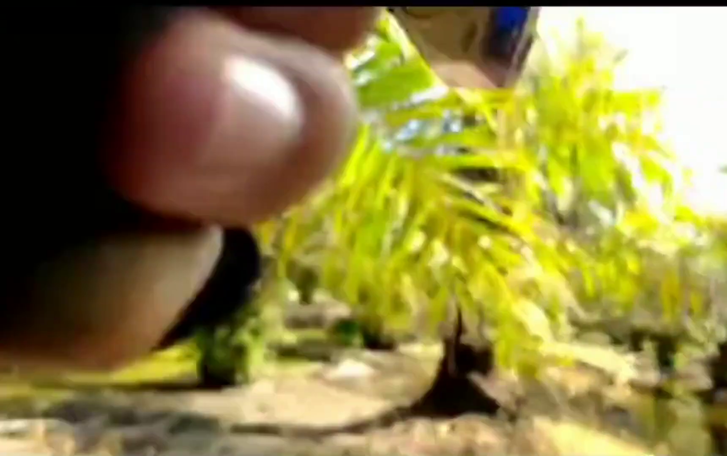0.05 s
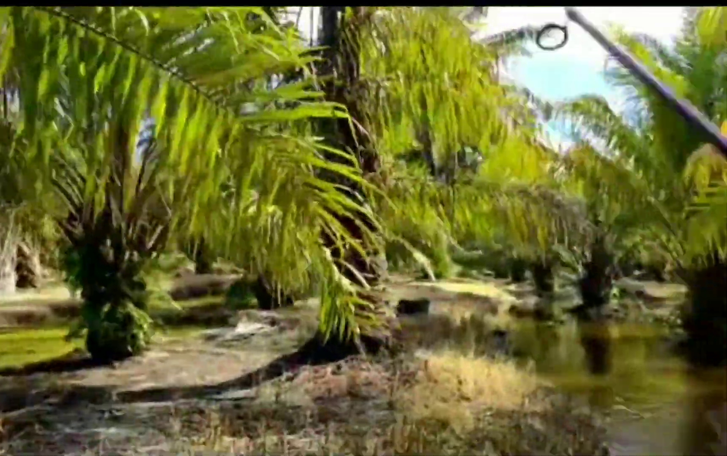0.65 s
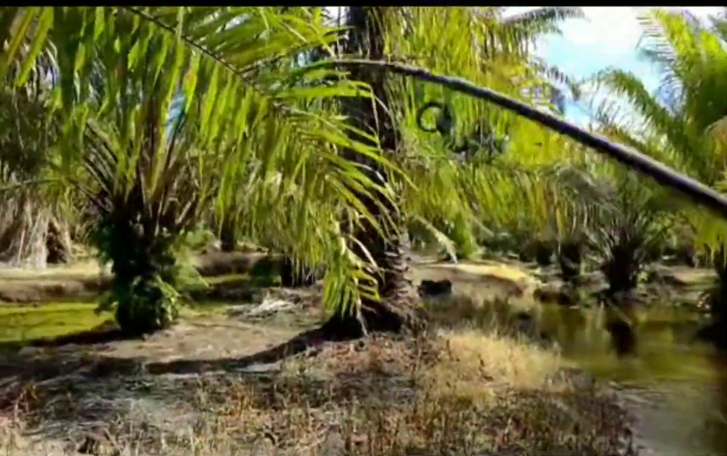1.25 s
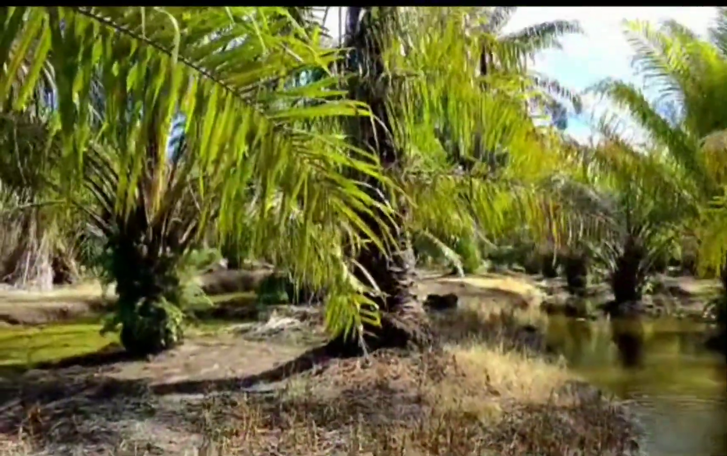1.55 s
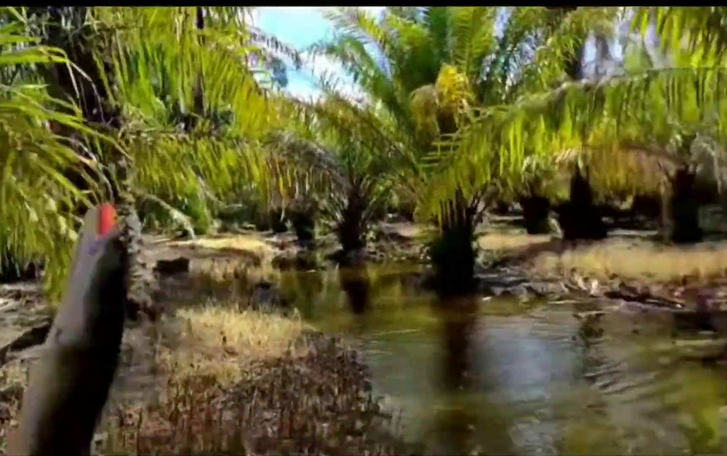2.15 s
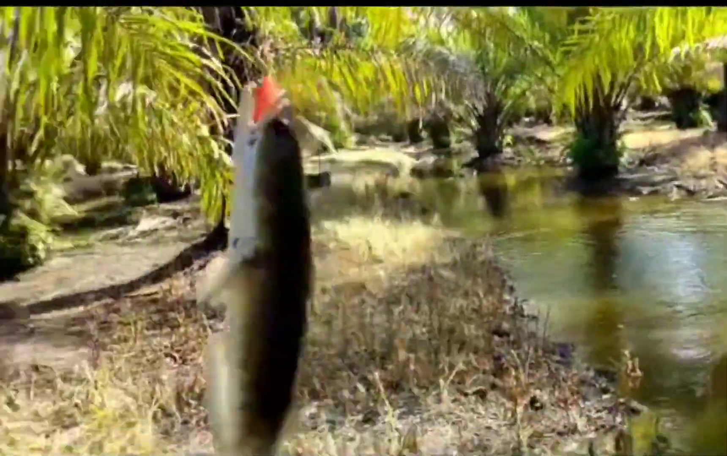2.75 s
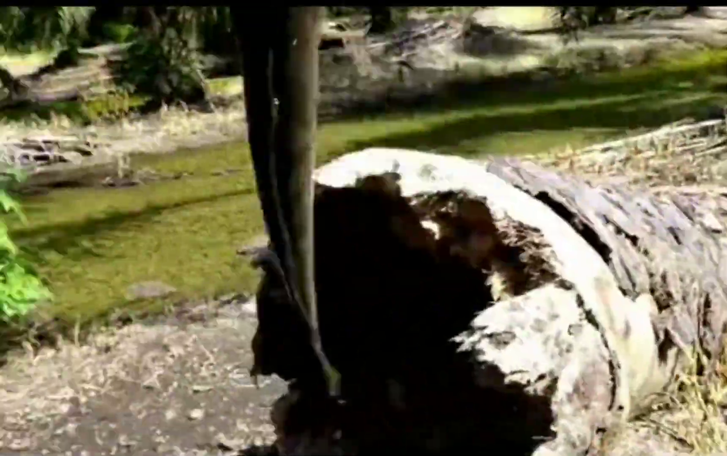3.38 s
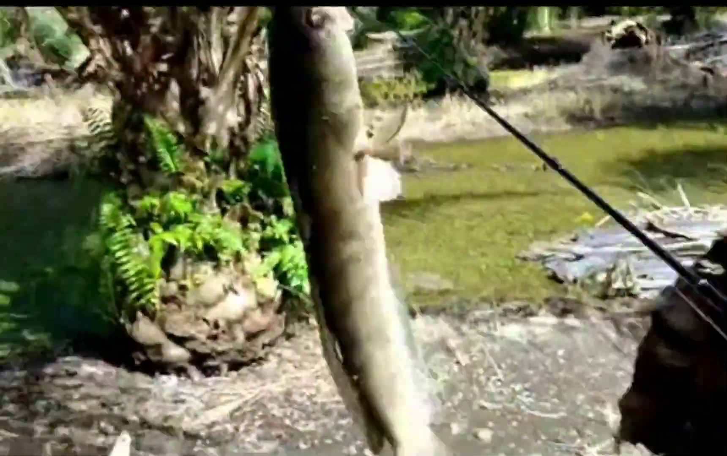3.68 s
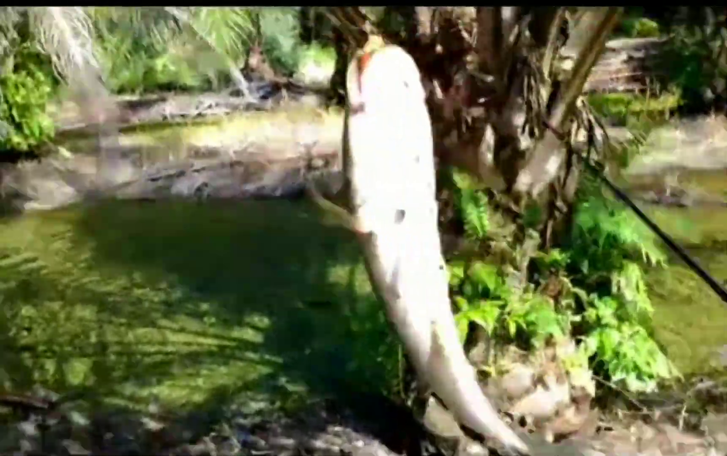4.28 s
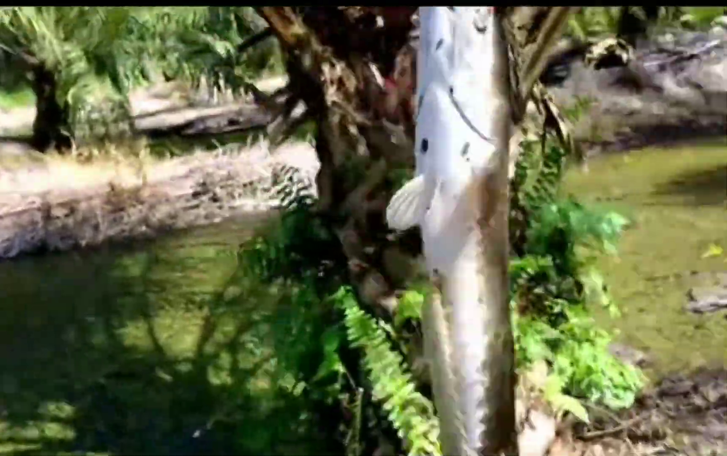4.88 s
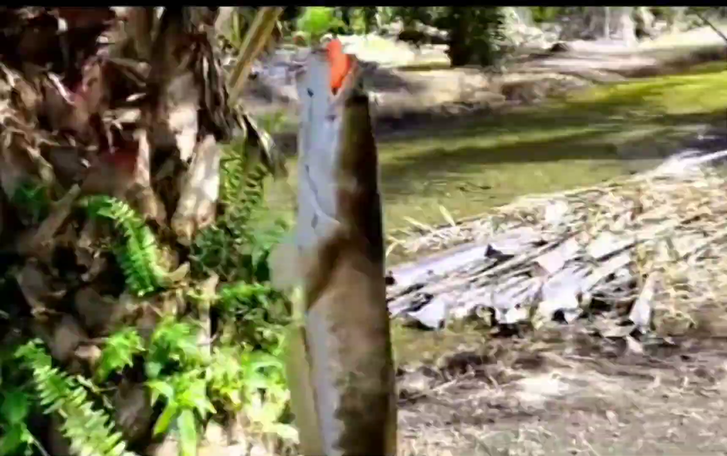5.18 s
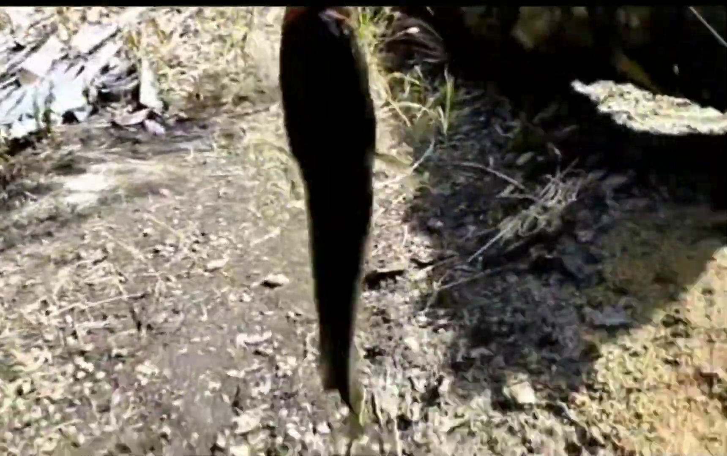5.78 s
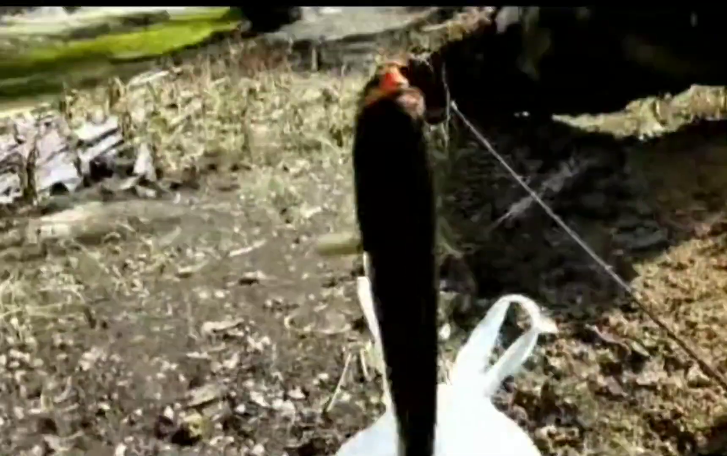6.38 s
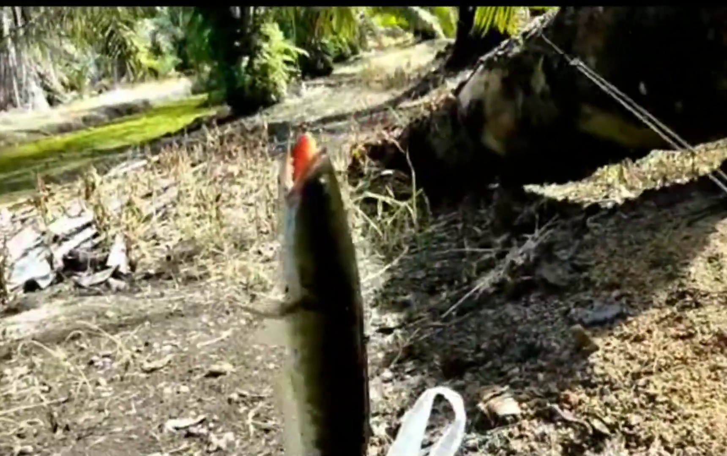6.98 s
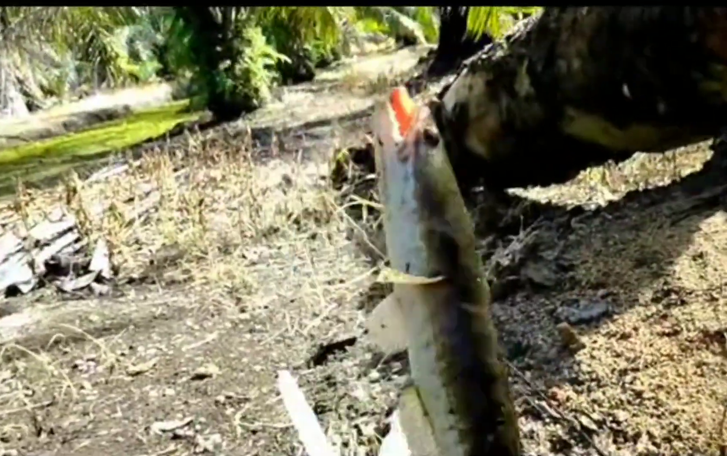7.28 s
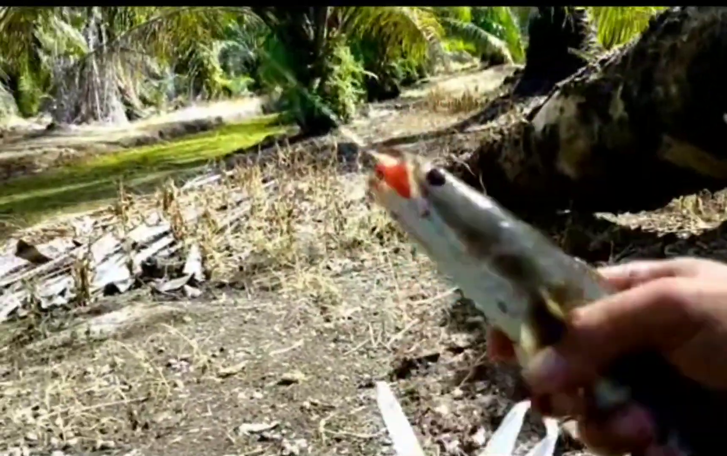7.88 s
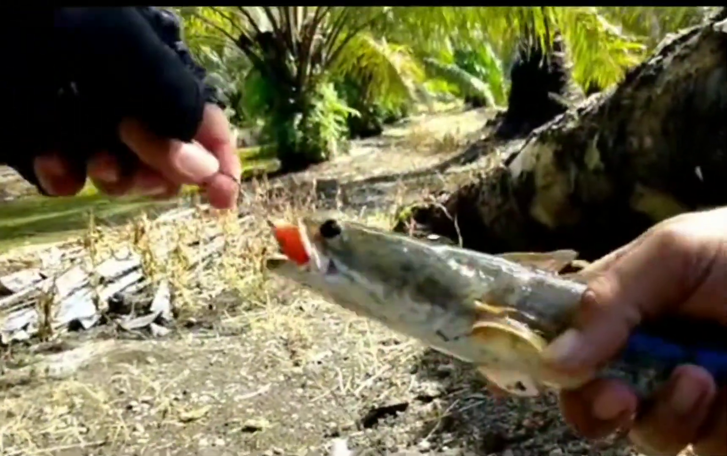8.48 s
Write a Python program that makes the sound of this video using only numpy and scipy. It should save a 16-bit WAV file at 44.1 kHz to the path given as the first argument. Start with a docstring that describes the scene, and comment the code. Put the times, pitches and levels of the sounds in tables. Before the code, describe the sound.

In a palm grove beside a pond, a bird on the left repeats short falling whistles while others answer from far off. Midway, a louder animal, perhaps a gibbon, gives rising whoops and a wavering hoot that echo through the trees, then whoops twice more near the end. Crickets chirp over a high insect drone, faint songbirds and a distant engine hum. Fishing tackle ticks lightly close to the microphone.

```python
"""A palm plantation by a pond. A bird repeats short falling whistles and others answer from far off;
a larger caller, perhaps a gibbon, whoops through the trees. Trunks and fronds scatter the calls into
long tails. Crickets rub their wings in turn over faint songbirds and a high insect drone, two distant
pump engines hum and beat, and fishing tackle ticks close by."""
import sys
import numpy as np
from scipy import signal
from scipy.fft import rfft, irfft
from scipy.io import wavfile

SR = 44100
rng = np.random.default_rng(int(sys.argv[2]) if len(sys.argv) > 2 else 0)


def output_pcm(signal):
    """Save a mono or channel-first signal as 16-bit PCM at the path in sys.argv[1].

    Samples are clipped to [-1, 1] before scaling.
    """
    pcm = np.clip(np.atleast_2d(signal).T, -1, 1) * 32767
    wavfile.write(sys.argv[1], SR, np.round(pcm).astype(np.int16))


N = 381024
T = np.arange(N) / SR
FREQ = np.fft.rfftfreq(N, 1 / SR)


def whistle(length_s, final_hz, fall_db, held_db):
    """A quick fall of almost an octave onto a short, slightly sinking tone."""
    fall_s = .031
    t = T[:int(length_s * SR)]
    ratio = np.interp(t, [0, fall_s, 2 * fall_s], [1.85, 1.025, 1])
    dip_db = -5 * np.exp(-((ratio - 1.256) / .2) ** 2)  # thins part-way down
    db = np.interp(t, [fall_s, 1.1 * fall_s], [fall_db, held_db]) + dip_db + 3 * walk(140, len(t))
    hz = final_hz * ratio * (1 + .008 * walk(200, len(t)))
    return fade(t, attack_s=.0092, release_s=.0091) * undb(db) * np.sin(phase_of(hz))


def whistlers():
    """One near bird with a quick trunk echo; others answer, blurred by distance."""
    # near notes: (time [s], length [s], final pitch [Hz], fall level [dB], held level [dB])
    whistles = [(0.261, 0.077, 1148, -48, -49.5), (0.702, 0.093, 1166, -44, -47),
                (1.094, 0.084, 1195, -44.5, -44), (1.509, 0.08, 1193, -42, -42),
                (3.648, 0.1, 1148, -42, -45.5), (4.132, 0.095, 1167, -41, -42.5),
                (4.543, 0.081, 1208, -39, -43), (5.597, 0.085, 1164, -41.5, -41.5),
                (6.022, .085, 1158, -39.5, -43), (6.425, 0.087, 1186, -39, -39),
                (6.861, 0.082, 1154, -40.5, -42.5), (7.305, 0.056, 1180, -42.5, -36)]
    # far series: (start [s], end [s], period [s], final pitch [Hz], level [dB])
    answers = [(.42, 1.5, 0.54, 1150, -60), (1.865, 3.3, 0.42, 1140, -58), (1.905, 3.4, .45, 1040, -60.5),
               (2.075, 2.6, 0.41, 1160, -57), (5.0, 7.8, .45, 1153, -56), (5.8, 7.7, 0.41, 1069, -61)]
    near, far, trunk = np.zeros((3, N))
    for s, *note in whistles:
        add(near, s, whistle(*note))
    for start_s, end_s, period_s, hz, db in answers:
        for s in np.arange(start_s, end_s, period_s):
            final_hz = hz * (1 + .0136 * rng.standard_normal())
            add(far, s, whistle(.095, final_hz, db - 5.5, db))
    add(trunk, .011, undb(-7) * near)
    out = undb(1.5) * place(near + trunk, pan_db=13.5, lag_samples=-5)
    out += undb(5.5) * grove(near, build_s=.0058, t60_s=.38, far_db=-17, far_t60_s=2.3)
    out += undb(4) * place(far, pan_db=3, lag_samples=-4)
    return out + undb(6.5) * grove(far, build_s=.0016, t60_s=.12, far_db=-4, far_t60_s=16)


def whoop_tone(length_s, rise_s, start_hz, top_hz, end_hz, lateness):
    """An unsteady tone gliding from start to top to end pitch; returns amplitude, pitch, phase."""
    # how strongly each pitch carries: (pitch [Hz], gain [dB])
    colour = [(630, -25), (680, -13), (745, -15), (810, -7.5), (925, 2), (985, -1.5), (1040, -8.5),
              (1135, -3), (1210, -5.5)]
    t = T[:int(length_s * SR)]
    climb = np.sin(np.pi / 2 * np.minimum(t / rise_s, 1) ** lateness) ** 2
    settle = np.clip((t - rise_s) / max(length_s - rise_s, 1 / SR), 0, 1)
    hz = start_hz + (top_hz - start_hz) * climb + (end_hz - top_hz) * settle
    db = np.interp(hz, *np.transpose(colour)) + 1.5 * walk(25.7, len(t))
    amp = undb(db) * fade(t, attack_s=.03, release_s=.016)
    return amp, hz, phase_of(hz * (1 + .012 * walk(72.8, len(t))))


def whooper():
    """Nearly pure calls, mostly from the right; the octave shows at high pitch and in the echoes."""
    # hoots, and the pulses (4.945 to 5.325 s) of one long low note wavering among its echoes:
    # (time [s], length [s], rise [s], start [Hz], top [Hz], end [Hz],
    # rise lateness [1 = even], level [dB], left minus right [dB])
    tones = [(3.638, .15, 0.16, 649, 1057, 1035, 1.58, -21.5, -13.5),
             (4.232, .14, 0.16, 843, 1014, 1010, 0.98, -21, -17.5),
             (4.428, 0.072, 0.021, 924, 907, 919, 1.3, -22.5, -23),
             (4.575, .13, 0.073, 804.3, 837, 805, 1.16, -20.5, -7.5),
             (4.742, 0.073, 0.028, 745, 767, 751, 1.26, -14.5, -6),
             (4.945, 0.17, 0.09, 643.7, 760, 764.4, 0.88, -16.5, -5.5),
             (5.105, 0.049, 0.059, 745.3, 752, 736, 1.3, -5, -5),
             (5.19, 0.138, 0.043, 748.4, 747.6, 732, 0.83, -13.5, 7.5),
             (5.325, 0.18, 0.023, 756, 742.3, 733, 1, -19.5, -4),
             (7.748, 0.13, 0.13, 729, 1163, 1170, 1.22, -19.5, -12.5),
             (8.437, 0.098, 0.097, 848, 1205, 1220, 0.87, -18.5, -13.5)]
    # faint low hoot tones lingering far off among the trees: same columns without the last
    lingering = [(5.75, 0.603, .19, 736, 761, 755, 0.902, -35.5),
                 (6.85, 0.833, 0.054, 756, 757, 732, 0.7, -46.5)]
    voice, indirect, pan_db = np.zeros((3, N))
    for s, *shape, db, side_db in tones:
        amp, hz, phase = whoop_tone(*shape)
        octave = undb(np.interp(hz, [1000, 1130], [-42, -23]))
        add(voice, s, undb(db) * amp * (np.sin(phase) + octave * np.sin(2 * phase)))
        add(indirect, s, undb(db - 27) * amp * np.sin(2 * phase))
        add(pan_db, s, np.full(len(hz), side_db))
    for s, *shape, db in lingering:
        amp, _, phase = whoop_tone(*shape)
        add(indirect, s, undb(db) * amp * np.sin(phase))
    echoes = grove(voice + indirect, build_s=.04, t60_s=.86, far_db=-23.5, far_t60_s=8.5,
                   echoes_per_s=150, clump_db=1.5)
    return undb(-.5) * place(voice, pan_db, lag_samples=-21) + undb(-2) * echoes


def crickets():
    """Wings ring at one pitch per chirp, roughened by uneven tooth strokes and foliage."""
    # chirps: (time [s], pitch [Hz], level [dB])
    chirps = [(.3, 5465, -56.5), (.54, 5345, -60), (.96, 5540, -56.5), (1.0, 5330, -55),
              (1.321, 5445, -51.5), (1.56, 5335, -57.5), (1.97, 5325, -51.5), (2.33, 5420, -56),
              (2.41, 5480, -48.5), (2.699, 5355, -47), (3.04, 5430, -55), (3.14, 5485, -51),
              (3.462, 5540, -55), (3.669, 5355, -53.5), (3.881, 5420, -50.5), (4.21, 5340, -49.5),
              (4.56, 5480, -49.5), (4.95, 5350, -51), (5.01, 5540, -56), (5.334, 5470, -50),
              (5.589, 5415, -54.5), (5.89, 5345, -46.5), (6.201, 5500, -50), (6.6, 5410, -54),
              (6.936, 5345, -50), (7.225, 5480, -51), (7.5, 5550, -54), (7.58, 5380, -53.5),
              (7.95, 5480, -51), (8.359, 5350, -50), (8.439, 5430, -52.5)]
    chirp_s, pitch_scatter, flutter_db = .15, .0105, 3
    wings = np.zeros(N)
    n = int(chirp_s * SR)
    envelope = fade(T[:n], attack_s=.013, release_s=.083)
    for s, hz, db in chirps:
        phase = phase_of(hz * (1 + pitch_scatter * walk(549, n)))
        add(wings, s, undb(db + flutter_db * walk(125.5, n)) * envelope * np.sin(phase))
    direct = place(wings, pan_db=-2, lag_samples=-5.1)
    echoes = grove(wings, build_s=.01, t60_s=.51, far_db=-36, far_t60_s=.6)
    return undb(10.5) * direct + undb(4.5) * echoes


def contact_noise(centre_hz, n, correlation=.6):
    """Stereo noise of a dry contact, two octaves wide."""
    band = signal.butter(2, [centre_hz / 2, min(centre_hz * 2, SR / 2.3)], "band", fs=SR, output="sos")
    common, separate = rng.standard_normal(n), rng.standard_normal((2, n))
    noise = np.sqrt(correlation) * common + np.sqrt(1 - correlation) * separate
    return unit(signal.sosfilt(band, noise))


def tackle():
    """Short dry contacts and grainy rustles close by."""
    # rod, line and lure knocks: (time [s], level [dB], centre [Hz], decay [s])
    ticks = [(1.531, -40, 420, .01), (1.7722, -28, 1400, .0007), (1.774, -41, 700, .008),
             (1.781, -48, 2400, .006), (2.942, -43.5, 400, .01), (3.123, -50, 550, .012),
             (3.502, -41.5, 560, .011), (7.9418, -35.5, 9500, .0026), (7.943, -35, 2300, .001)]
    # line and sleeve rubbing: (time [s], length [s], level [dB], centre [Hz])
    rustles = [(1.509, 0.071, -47.5, 3300), (3.48, 0.059, -49.5, 3000), (3.884, .055, -49, 1890),
               (4.7, 0.065, -48.5, 1980)]
    out = np.zeros((2, N))
    t = T[:SR // 6]
    for s, db, hz, decay_s in ticks:
        envelope = (1 - np.exp(-t / (.2 * decay_s))) * np.exp(-t / decay_s)
        add(out, s, undb(db) * envelope * contact_noise(hz, len(t)))
    for s, length_s, db, hz in rustles:
        n = int(length_s * SR)
        grain_db = 3 * walk(540, n)
        add(out, s, undb(db + grain_db) * signal.windows.hann(n) * contact_noise(hz, n))
    return out


def songbirds():
    """Thin wavering slurs that level off, blurred by distance, among fainter twitter."""
    # slurs: (time [s], start pitch [Hz], rise [Hz], level [dB])
    song = [(.68, 2656, 128.5, -70), (1.05, 2810, 71, -66.5), (1.52, 3220, 53, -70.5),
            (2.12, 3160, 140, -66), (2.72, 3200, 142.5, -64.5), (2.879, 2957, -72, -64.5),
            (3.38, 3180, 128.5, -67), (5.07, 2997, 102, -62), (5.521, 2666, 179, -68.5),
            (5.89, 2815, 228, -60.5), (6.25, 2636, 180, -69.5), (6.689, 2792, 224, -65),
            (6.93, 2610, 190.5, -69), (7.339, 2750, 229, -63.5), (7.65, 2520, 221, -66),
            (7.919, 2780, 131.5, -64.5), (8.2, 2519, 140, -65), (8.42, 2796, 53, -63)]
    note_s, pitch_waver, flutter_db = .29, .019, 2.5
    notes = [(s, note_s, *note) for s, *note in song]
    twitter = [(8.5 * when, .08 + .1 * length, 2100 + 2000 * pitch, 400 * rise - 150, -76 + 3 * level)
               for when, length, pitch, rise, level in rng.random((110, 5))]
    voice = np.zeros(N)
    for s, length_s, start_hz, rise_hz, db in twitter + notes:
        t = T[:int(length_s * SR)]
        hz = start_hz + rise_hz * np.sin(np.pi / 2 * t / length_s)
        hz *= 1 + pitch_waver * walk(149.6, len(t))
        amp = undb(db + flutter_db * walk(43.4, len(t))) * fade(t, attack_s=.013, release_s=.083)
        add(voice, s, amp * np.sin(phase_of(hz)))
    return undb(11.5) * grove(voice, build_s=.0048, t60_s=.079, far_db=-23, far_t60_s=1.6)


def bush_crickets():
    """Rasping wings: bursts of a high tone whose pitch scatters from tooth to tooth."""
    # burst series: (start [s], end [s], period [s], length [s], pitch [Hz], level [dB])
    buzzes = [(0, .6, .33, .38, 9560, -59), (1.85, 4, 1.85, .42, 15250, -64),
              (2.22, 8.6, 1.045, .85, 10920, -61), (4.3, 7.8, 1.07, .6, 4260, -60)]
    pitch_scatter, flutter_db = .024, 3.5
    out = np.zeros((2, N))
    for start_s, end_s, period_s, length_s, hz, db in buzzes:
        n = int(length_s * SR)
        for s in np.arange(start_s, min(end_s, T[-1]), period_s):
            rasp = np.sin([phase_of(hz * (1 + pitch_scatter * walk(1500, n))) for _ in range(2)])
            add(out, s, undb(db + flutter_db * walk(42.3, n)) * signal.windows.hann(n) * rasp)
    return out


def chorus():
    """Countless insects merge into narrow bands that waver and flicker."""
    # bands: (centre [Hz], half-width [Hz], level [dB], slow waver [dB])
    bands = [(4266, 50, -63.5, 3), (4857, 380, -54, -5), (4915, 98, -58.5, 5.5), (5370, 140, -56, 2),
             (6015, 160, -61, -2), (6416, 250, -61.5, 3), (8567, 1010, -55.5, 0.64)]
    out = np.zeros((2, N))
    for hz, half_width_hz, db, waver_db in bands:
        amp = undb(db + waver_db * walk(4) + .9 * walk(28))
        out += amp * stereo_noise(peak(hz, half_width_hz), correlation=.54, lag_samples=-4)
    return out


def pumps():
    """Two slow, distant engines beat, ever more slowly as their speeds draw together."""
    # engine orders: (multiple of cycle rate, relative level [dB])
    orders = [(3, -31), (4, 0.5), (5, -36), (6, -40), (7, -15), (8, -13), (9, -14.5)]
    cycle_hz, level_db = 12.45, -50.5
    beat_hz = .69 - .0659 * T  # at order 4, the strongest
    cycle = phase_of(cycle_hz * (1 + .0021 * walk(1.72)))
    lead = phase_of(beat_hz) / 4
    hum = np.zeros(N)
    for order, db in orders:
        start = rng.uniform(0, 2 * np.pi)
        pair = np.sin(order * (cycle + lead / 2) + start) + np.sin(order * (cycle - lead / 2) + start)
        hum += undb(level_db + db + .57 * walk(2.3)) * pair / 2
    return place(hum, pan_db=.5, lag_samples=-5)


def rumble():
    """A faint band of low noise that swells while the rod is raised."""
    # envelope: (time [s], level [dB])
    levels = [(0, -69), (1.2, -69.5), (1.6, -64.5), (2.6, -64), (3.1, -61.5), (3.6, -74)]
    return gain_curve(levels) * stereo_noise(peak(centre_hz=256, half_width_hz=106), correlation=0)


def air():
    """A soft, wide bed of far leaves and rumble."""
    # spectrum: (frequency [Hz], relative density [dB])
    spectrum = [(20, 6), (35, 11), (70, 5.5), (130, -1), (250, -3), (450, -7), (1000, -5.5), (1800, -8),
                (3000, -7.5), (4500, -9.5), (6400, -11), (7100, -94), (9500, -23), (15500, -23)]
    level_db, waver_db = -50, .8
    hz, db = np.transpose(spectrum)
    colour = undb(np.interp(np.log(FREQ + 1), np.log(hz), db)) * FREQ / (FREQ + 8)
    correlation = np.interp(FREQ, [50, 130, 300, 3000], [.13, -.22, -.34, -.3])
    return undb(level_db + waver_db * walk(9.6)) * stereo_noise(colour, correlation)


def grove(x, build_s, t60_s, far_db, far_t60_s, echoes_per_s=SR, clump_db=0):
    """Scatter from trunks and fronds: echoes build and die; distant trees add a fainter tail."""
    t = T[:3 * SR]
    decay = undb(-60 * t / t60_s) + undb(far_db - 60 * t / far_t60_s)
    envelope = (1 - np.exp(-(t / build_s) ** 2)) * decay * undb(clump_db * walk(30, len(t)))
    density = np.minimum(echoes_per_s * (1 + 2 * t) ** 2 / SR, 1)  # echoes crowd with time
    impulses = np.sign(rng.standard_normal((2, len(t)))) * (rng.random((2, len(t))) < density)
    response = impulses * envelope / np.sqrt(density * np.sum(envelope ** 2))
    return signal.fftconvolve(x[None], response, axes=1)[:, :N]


def place(x, pan_db, lag_samples):
    """Direct path; level and lag are left relative to right."""
    left = irfft(rfft(x) * np.exp(-2j * np.pi * FREQ * lag_samples / SR), N)
    return np.array([left * undb(pan_db / 2), x * undb(-pan_db / 2)])


def stereo_noise(colour, correlation, lag_samples=0):
    """Coloured, partly correlated noise at rms 1; the lag delays the left."""
    correlation = np.broadcast_to(correlation, FREQ.shape)
    mid, side = rfft(rng.standard_normal((2, N))) * colour * np.sqrt([1 + correlation, 1 - correlation])
    left = (mid + side) * np.exp(-2j * np.pi * FREQ * lag_samples / SR)
    return unit(irfft(np.array([left, mid - side]), N))


def peak(centre_hz, half_width_hz):
    """Spectral peak, 12 dB down at the half-width."""
    return (1 + ((FREQ - centre_hz) / half_width_hz) ** 2) ** -2


def walk(rate_hz, n=N):
    """Wander between random knots of spread 1."""
    knots = rng.standard_normal(int(n / SR * rate_hz) + 3)
    return np.interp(np.arange(n) / SR * rate_hz, np.arange(len(knots)), knots)


def fade(t, attack_s, release_s):
    """Linear attack, hold, release."""
    return np.clip(np.minimum(t / attack_s, (t[-1] - t) / release_s), 0, 1)


def gain_curve(rows):
    """Gain through (time [s], level [dB]) points."""
    return undb(np.interp(T, *np.transpose(rows)))


def phase_of(hz):
    """Running phase of a moving pitch."""
    return 2 * np.pi * np.cumsum(hz) / SR


def add(out, s, sound):
    """Mix a sound in at time s."""
    i = int(s * SR)
    out[..., i:i + sound.shape[-1]] += sound[..., :N - i]


def undb(db):
    """Decibels to gain."""
    return 10 ** (np.asarray(db) / 20)


def unit(x):
    """Scale to rms 1."""
    return x / np.sqrt(np.mean(x ** 2))


def scene():
    """Callers and tackle over the background."""
    # slow rise of the background: (time [s], gain [dB])
    swell = [(0, -5.5), (.7, -3.5), (1.3, -1.5), (2.1, 0.5), (5, 1), (8.64, 1)]
    background = (air() + chorus() + pumps()) * gain_curve(swell) + rumble()
    return background + crickets() + bush_crickets() + songbirds() + whistlers() + whooper() + tackle()


def record(dry):
    """A narrow treble dip in the microphone, then a steep low-pass."""
    notch_hz, notch_width_hz, top_hz = 7200, 700, 15800
    dipped = signal.lfilter(*signal.iirnotch(notch_hz, notch_hz / notch_width_hz, fs=SR), dry)
    return signal.sosfilt(signal.ellip(10, .2, 80, top_hz, fs=SR, output="sos"), dipped)


dry = scene()
out = record(dry)
output_pcm(out)
```